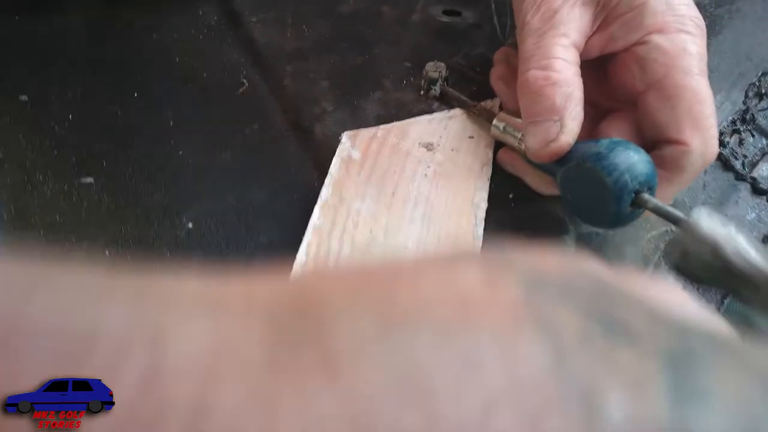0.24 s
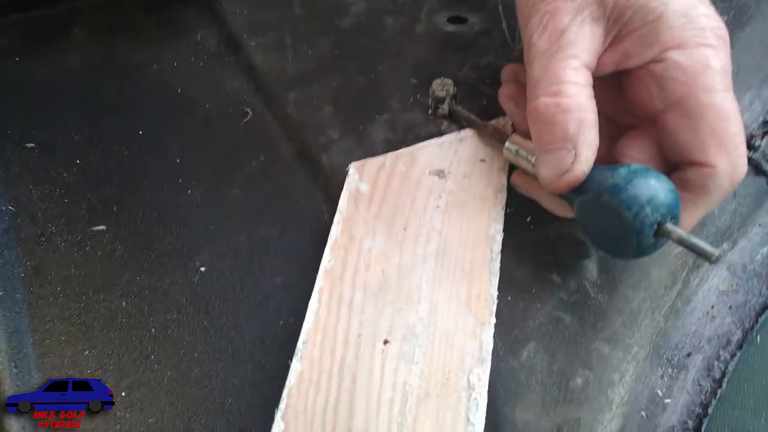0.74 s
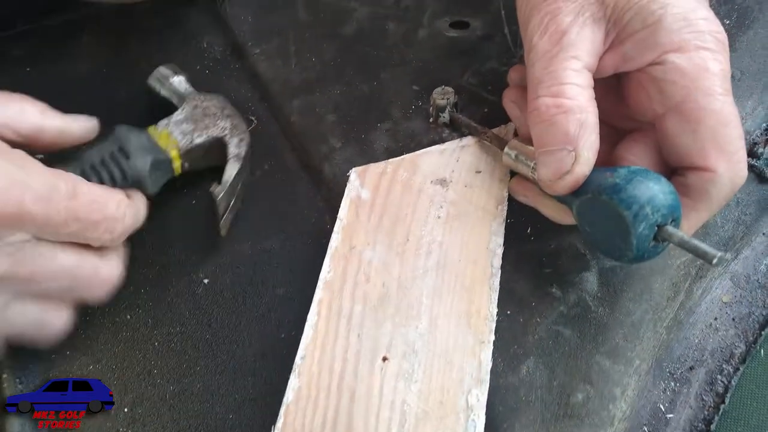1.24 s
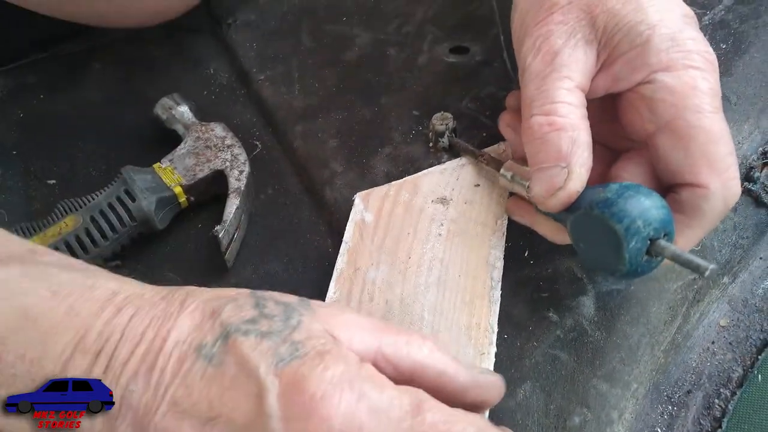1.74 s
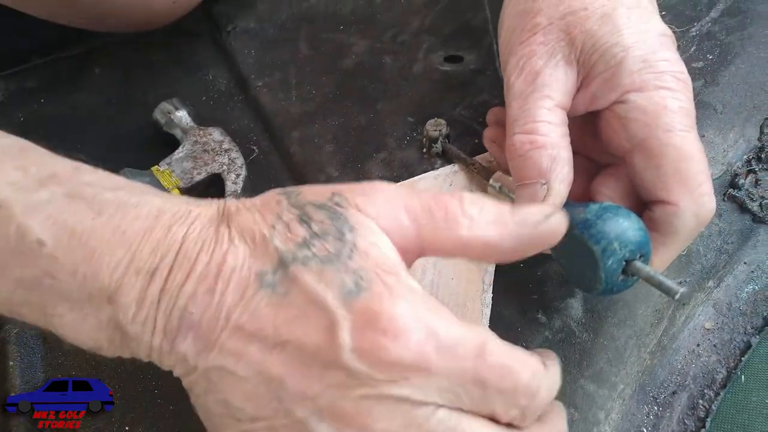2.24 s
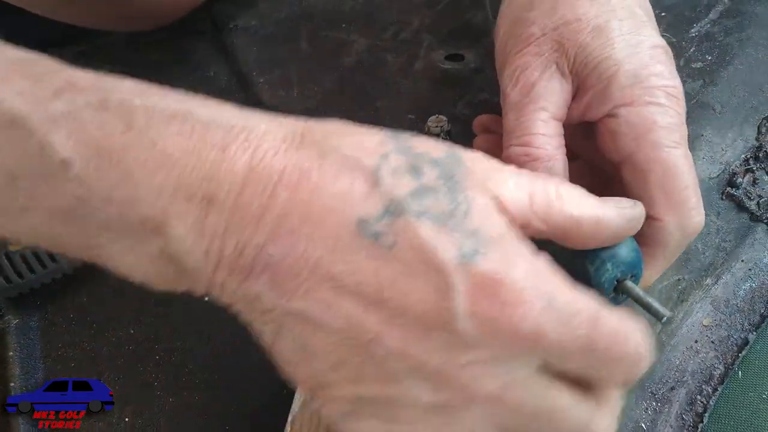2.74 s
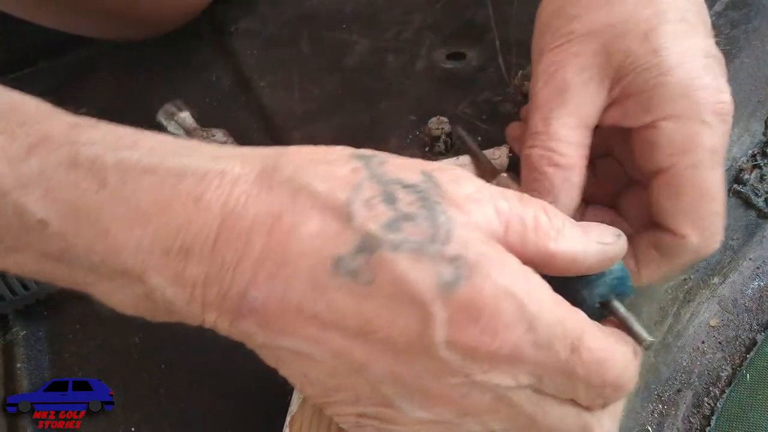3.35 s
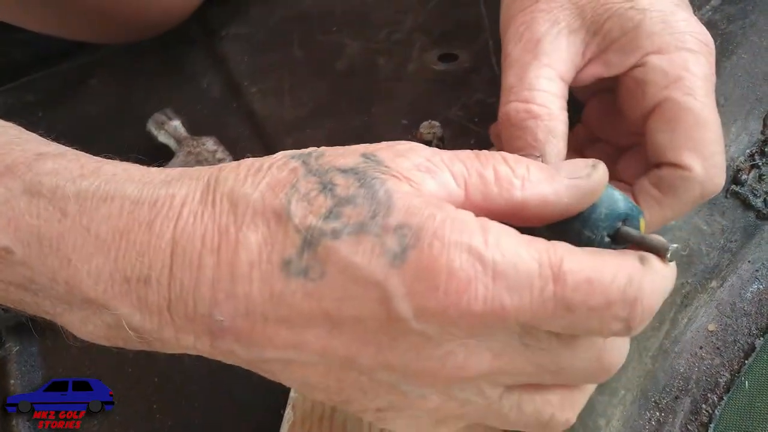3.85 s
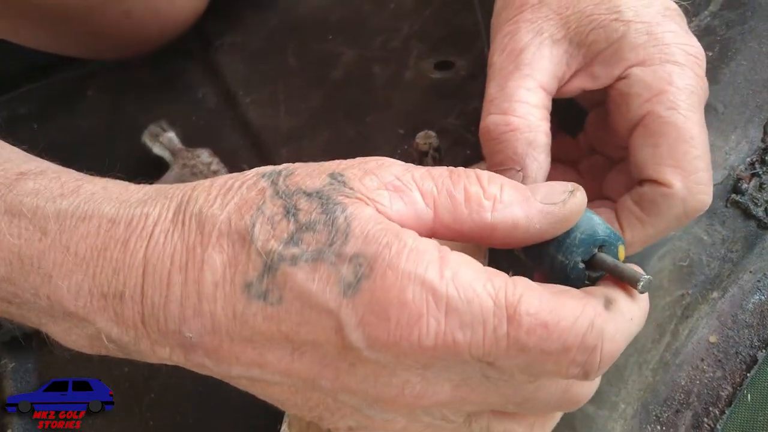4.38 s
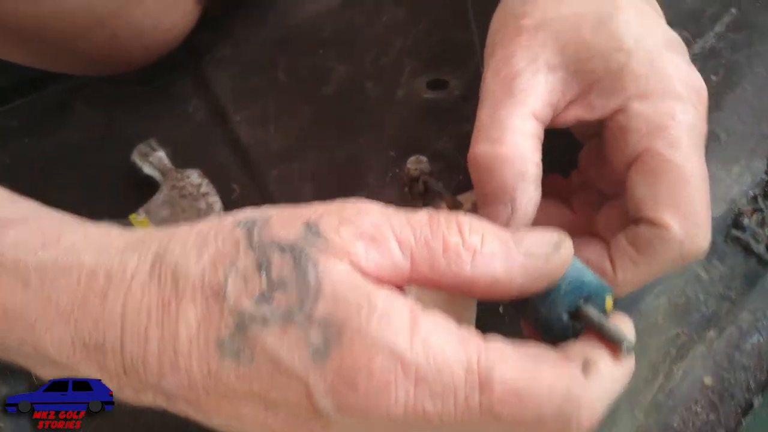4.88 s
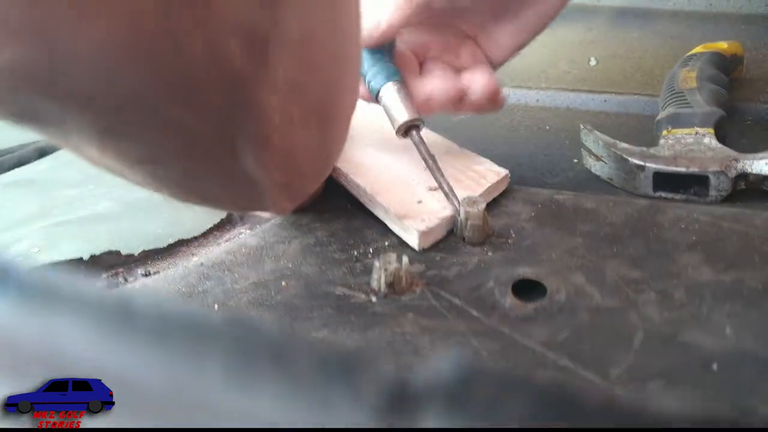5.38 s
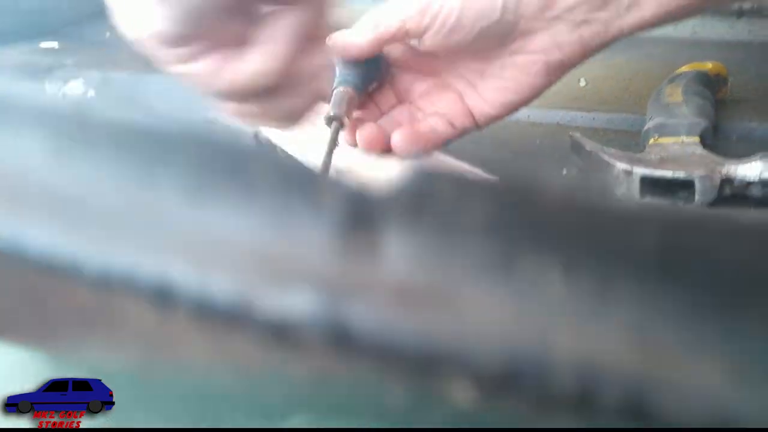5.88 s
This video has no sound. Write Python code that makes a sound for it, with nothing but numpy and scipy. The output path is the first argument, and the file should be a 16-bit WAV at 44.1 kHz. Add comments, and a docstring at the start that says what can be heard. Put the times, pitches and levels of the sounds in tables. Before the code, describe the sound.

Sharp clanging hammer blows on sheet metal, a heavy tool set down with a boom, then quiet handling, light taps and a late scraping flurry.

```python
"""Quiet workshop, two close microphone ports; the right one faces the work and hears more treble.
First a hammer taps a screwdriver wedged against a stud on a steel panel: ringing modes, cracks, dense noise.
Near 1.4 s the hammer head is laid flat on the panel, a contact with a long low boom, among tool and block knocks.
Then hands slide a wooden block and work the tool loose: uneven noise for rubbing, pitched pings for knocks.
Under it all lie shaped noise for still air, narrow noise for a distant machine, and hiss; thin tones glide past."""
import sys
import numpy as np
from scipy import signal
from scipy.io import wavfile
from scipy.ndimage import uniform_filter1d

SR = 44100
rng = np.random.default_rng(int(sys.argv[2]) if len(sys.argv) > 2 else 0)


def unload_audio(sound):
    """Save the sound as a 16-bit wav file, at the path given as the first command line argument."""
    columns = np.transpose(np.atleast_2d(sound))
    # keep every value between -1 and 1, then stretch to whole-number steps
    steps = np.round(np.clip(columns, -1, 1) * 32767)
    wavfile.write(sys.argv[1], SR, steps.astype(np.int16))


N = 269857


def from_db(db):
    """Decibels to amplitude."""
    return 10 ** (np.asarray(db) / 20)


def rms_one(x):
    """Scale to rms 1 over all channels together."""
    return x / np.sqrt(np.mean(x ** 2) + 1e-20)


def at_hz(points, hz):
    """Read a (pitch, value) curve on a log pitch axis."""
    pitch_hz, value = np.array(points).T
    return np.interp(np.log(hz), np.log(pitch_hz), value)


CONTACT_HZ = (130, 500, 2100, 8000)   # pitches of thud, body, clang, sizzle
RUB_HZ = (130, 550, 2300, 5200, 11000)   # pitches of thud, body, clang, crunch, sizzle


def blend(hz, *levels_db, places=CONTACT_HZ):
    """Levels placed at a few pitches and joined on a log axis."""
    weights = np.eye(len(places))
    return sum(level_db * np.interp(np.log(hz), np.log(places), weight)
               for level_db, weight in zip(levels_db, weights))


def drift(rate_hz):
    """Slow chance with spread 1: noise through two equal low-pass poles, drawn every 40 samples."""
    r = np.exp(-2 * np.pi * rate_hz * 40 / SR)
    slow = signal.lfilter([1], [1, -2 * r, r * r], rng.standard_normal(N // 40 + 2002))
    slow = rms_one(slow[2000:])   # drop the filter's start
    return np.interp(np.arange(N) / 40, np.arange(len(slow)), slow)


def resonate(x, hz, width_hz):
    """A two-pole resonance, like a body answering noise at one pitch."""
    r = np.exp(-np.pi * width_hz / SR)
    numerator = np.array([1, 0, -1]) * (1 - r * r) / 2
    return signal.lfilter(numerator, [1, -2 * r * np.cos(2 * np.pi * hz / SR), r * r], x)


def add(track, start_s, piece):
    """Lay a stereo piece into the track, trimmed at both ends."""
    at = round(start_s * SR)
    piece = piece[:, max(-at, 0):N - at]
    track[:, max(at, 0):max(at, 0) + piece.shape[1]] += piece


# dB between the ports for each unit of lean: pitch_hz, db_per_lean (negative lean favours the right)
SHADOW = [(100, -0.4), (300, 0), (1000, 0.6), (3000, 5.5), (8000, 3), (14000, 5)]


def sides(db, lean, hz):
    """Left and right gain; the port that faces away loses mostly treble."""
    half_db = 0.5 * lean * at_hz(SHADOW, hz)
    return from_db([db + half_db, db - half_db])


# how alike the two ports hear a sound: pitch_hz, likeness (1 = same, 0 = unrelated, -1 = opposite)
LIKENESS = [(60, 0.87), (130, 1), (290, 0.93), (640, 0.65), (1410, -0.04), (3100, -0.07), (6820, -0.43),
            (15000, 0.04)]
EDGES_HZ = 25 * 2 ** np.arange(0, 9.7, 0.4)


def bands(noise):
    """Stereo bands of rms 1, alike in the bass; neighbours use unrelated noise."""
    for k, (low, high) in enumerate(zip(EDGES_HZ, EDGES_HZ[1:])):
        band_pass = signal.butter(2, [low, high], "band", fs=SR, output="sos")
        mid, side = signal.sosfilt(band_pass, noise[k % 2])
        hz = np.sqrt(low * high)
        alike = at_hz(LIKENESS, hz)
        yield hz, rms_one(np.sqrt(1 + alike) * mid + np.sqrt(1 - alike) * side * [[1], [-1]])


def self_noise():
    """The microphone's own faint treble hiss: high-passed noise, unrelated in the two ports."""
    high_pass = signal.butter(2, 8000, "high", fs=SR, output="sos")
    return from_db(-76) * signal.sosfilt(high_pass, rng.standard_normal((2, N)))


# distant machine: pitch_hz, level_db (rms), width_hz
HUM = [(83.4, -66.5, 1.6), (142, -75, 9.1)]


def hum():
    """Distant machine: noise in narrow resonances gives low tones that waver, equal in both ports."""
    out = np.zeros(N)
    for hz, level_db, width_hz in HUM:
        out += from_db(level_db) * rms_one(resonate(rng.standard_normal(N), hz, width_hz))
    return out


# spectrum of the still workshop air: pitch_hz, level_db (per Hz, relative)
AIR = [(15, -53), (25, -18.5), (78, -12.5), (138, -4), (163, -15), (313, -14), (410, -29.5), (902, -20),
       (2330, -35.5), (2530, -24), (2750, -31), (4360, -37), (16500, -54.5)]
AIR_DB = -63.5   # rms of the whole


def still_air():
    """Still air of the workshop: bands of noise that each waver slowly in level."""
    air = np.zeros((2, N))
    for hz, band in bands(rng.standard_normal((2, 2, N))):
        level_db = at_hz(AIR, hz) + 1.1 * drift(2.5)
        air += from_db(level_db) * np.sqrt(hz) * band   # band width grows with pitch
    return from_db(AIR_DB) * rms_one(air)


# faint thin tones: start_s, length_s, start_hz, end_hz, level_db (rms before the fades), width_hz
TONES = [(1.8, 0.22, 3600, 2880, -61, 74), (3.7, 0.22, 1900, 2140, -58, 72),
         (3.955, .55, 3000, 2450, -83.5, 40), (4.535, 0.062, 4500, 4250, -70.5, 150),
         (2.756, 0.27, 2300, 2220, -63.5, 71), (4.678, 0.167, 2250, 2260, -59, 62),
         (5.03, 0.12, 2700, 2600, -68.5, 69), (5.027, .25, 3200, 2600, -59.5, 400),
         (5.292, 0.13, 2910, 2910, -70, 53), (5.32, 0.109, 2420, 2380, -69, 41)]


def thin_tones():
    """Thin gliding tones, roughened by narrow noise."""
    out = np.zeros((2, N))
    for start_s, length_s, start_hz, end_hz, level_db, width_hz in TONES:
        count = int(length_s * SR)
        phase = 2 * np.pi * np.cumsum(np.linspace(start_hz, end_hz, count)) / SR
        r = np.exp(-np.pi * width_hz / SR)
        a, b = signal.lfilter([1], [1, -2 * r, r * r], rng.standard_normal((2, 2, count)))
        tone = rms_one(a * np.cos(phase) + b * np.sin(phase))
        add(out, start_s, from_db(level_db) * np.hanning(count) ** 0.5 * tone)
    return out


# skin and wood sliding: start_s, rise_s, hold_s, fall_s,
# then thud_db, body_db, clang_db, crunch_db, sizzle_db, singing_db
RUB = [(1.187, 0.036, 0.027, 0.081, -33, -34, -26.5, -42.5, -48, -44.5),
       (1.352, 0.087, 0.059, 0.053, -36.5, -35, -53, -40.5, -42, -56.5),
       (1.451, 0.063, 0.025, 0.057, -37.5, -56, -54.5, -43.5, -45.5, -53),
       (1.701, 0.016, 0.053, 0.14, -50, -55.5, -45.5, -51.5, -50, -52.5),
       (1.831, .02, 0.11, 0.033, -61, -61.5, -58, -67, -65, -66.5),
       (2.064, 0.036, 0.085, 0.041, -59, -52.5, -46, -54, -53, -57),
       (2.173, .02, 0.076, 0.07, -48, -53.5, -45, -54, -57, -63),
       (2.299, 0.11, 0.097, 0.075, -56, -61, -51.5, -58.5, -59, -66.5),
       (2.753, 0.035, 0.092, 0.06, -53, -57, -50.5, -59.5, -61.5, -58.5),
       (2.967, 0.11, 0.011, .02, -49, -59.5, -53, -58.5, -63, -75),
       (3.319, .035, 0.048, 0.049, -61, -61, -44.5, -63.5, -62, -56),
       (3.445, 0.016, 0.049, 0.061, -53, -50, -54, -64, -65.5, -74),
       (3.568, 0.018, 0.09, 0.068, -55, -54, -54.5, -70, -66, -61),
       (3.688, 0.033, 0.025, 0.13, -54, -55, -55.5, -64, -67, -63.5),
       (3.862, .035, 0.014, 0.06, -54, -54.5, -62.5, -69, -79, -79),
       (4.644, 0.048, 0.013, .04, -60.5, -59, -53, -71, -69.5, -74),
       (5.115, 0.0095, 0.0057, 0.017, -36, -42, -68, -76, -49.5, -74),
       (5.151, 0.024, 0.019, 0.054, -49, -61, -56, -68, -59, -70),
       (5.417, 0.043, 0.044, 0.061, -53, -43.5, -50, -46.5, -52, -67),
       (5.461, 0.065, 0.019, .08, -47, -33.5, -33, -46.5, -51, -45),
       (5.61, 0.0068, 0.01, 0.023, -36, -31, -52, -59, -48.5, -49),
       (5.641, .02, 0.031, 0.11, -42, -26, -40.5, -48, -58, -45.5),
       (5.702, 0.0099, 0.061, 0.09, -53, -36, -50.5, -52.5, -57, -54),
       (5.997, 0.046, 0.023, 0.11, -75.5, -59, -56.5, -68.5, -71, -69)]
RUB_EDGE_DB = -16   # rise and fall times are counted to this level


def pressure():
    """Six levels in dB over time: every stroke rises, holds and falls away; the loudest one rules."""
    t = np.arange(N) / SR
    levels = np.full((6, N), -140.0)
    for start_s, rise_s, hold_s, fall_s, *levels_db in RUB:
        before = 1 - (t - start_s) / rise_s
        after = (t - start_s - rise_s - hold_s) / fall_s
        shape_db = RUB_EDGE_DB * np.maximum(np.maximum(before, after), 0)
        levels = np.maximum(levels, np.array(levels_db)[:, None] + shape_db)
    return uniform_filter1d(levels, size=200, axis=1)


# colour of the rubbing: pitch_hz, level_db (per band)
RUB_COLOUR = [(60, -19.5), (130, -9), (400, -5.5), (1000, -13), (2400, -15.5), (5200, -8), (8000, -14),
              (11000, 1), (16000, -2)]
# tool and block resonances under friction: pitch_hz, width_hz, level_db (relative)
RUB_PEAKS = [(396, 70, -5.5), (620, 89, -9.5), (1430, 70, -5.5), (1775, 77, -2.5), (2130, 81, -9.5),
             (2890, 120, -3.5), (4000, 170, -9.5), (4500, 550, -2.5)]
RUB_LEAN = -2.5


def rubbing():
    """Dense uneven micro-slips; all bands catch and let go together, and the tool's resonances sing along."""
    *colour, singing_db = pressure()
    clang_db = colour[2]
    slip_db = 2.4 * np.minimum(rng.exponential(1, N), 4)
    slips = rng.standard_normal((2, 2, N)) * from_db(slip_db)
    catch_db = 1.8 * drift(59) + 1.5 * drift(18)
    out = np.zeros((2, N))
    for hz, band in bands(slips):
        level_db = blend(hz, *colour, places=RUB_HZ) + at_hz(RUB_COLOUR, hz)
        level_db = level_db + catch_db + 2.1 * drift(3.9)
        out += band * from_db(level_db) * sides(0, RUB_LEAN, hz)[:, None]
    for hz, width_hz, peak_db in RUB_PEAKS:
        level_db = blend(hz, *colour, places=RUB_HZ) - clang_db + singing_db + peak_db
        level_db = level_db + catch_db + 3.8 * drift(4.6)
        singing = rms_one(resonate(slips[0], hz, width_hz))
        out += singing * from_db(level_db) * sides(0, RUB_LEAN, hz)[:, None]
    return out


def ringing(hz, t60_s, turn):
    """A dying sine that builds over a few cycles; the two ports meet it at different phases."""
    t = np.arange(int(1.5 * t60_s * SR) + 2) / SR
    fade = np.exp(-np.log(1000) * t / t60_s)
    cycles = hz * t
    swell = 1 - np.exp(-cycles / 3.5)
    lag = 0.5 * np.arccos(at_hz(LIKENESS, hz)) * turn
    return fade * swell * np.sin(2 * np.pi * cycles + np.array([[lag], [-lag]]))


def struck(contacts, modes, tone_db, scatter_db):
    """Each contact sets every mode ringing; a hand or block on the steel shortens the ring."""
    out = np.zeros((2, N))
    for start_s, strength_db, *colour, share, lean in contacts:
        for hz, mode_db, t60_s in modes:
            luck, turn = rng.standard_normal(2)
            level_db = strength_db + blend(hz, *colour) + tone_db + mode_db + scatter_db * luck
            add(out, start_s, sides(level_db, lean, hz)[:, None] * ringing(hz, t60_s * share, turn))
    return out


# dense ringing at full ring time: pitch_hz, t60_s
TAIL_T60 = [(80, 0.21), (210, 0.5), (560, 0.34), (1470, 0.31), (3880, 0.28), (10200, 0.2)]
# dense ringing: pitch_hz, level_db (per band, relative to the contact)
TAIL = [(60, -15), (150, -8.5), (300, -12), (700, -8.5), (1300, -15), (2600, -8), (5000, -12.5),
        (8000, -20), (11000, -13.5), (16000, -18.5)]
# first crack: pitch_hz, level_db (per band, relative to the contact)
CRACK = [(60, -34.5), (300, 0.5), (1000, -9), (2800, -6), (5000, -4.5), (8000, -14.5), (11000, 3),
         (16000, -9)]
CRACK_T60_S, SWELL_S = 0.018, 0.0039   # both lengthen in the bass
ROOM_DB, ROOM_T60_S = -20.5, 0.45   # room relative to the dense ringing


def contact(row, hz):
    """Stereo envelope of one contact in one band: crack, dense tail, faint room; lows start later."""
    _, strength_db, *colour, share, lean = row
    level_db = strength_db + blend(hz, *colour)
    t = np.arange(SR // 2) / SR
    steel = from_db(-60 * t / (at_hz(TAIL_T60, hz) * share))
    room = from_db(ROOM_DB - 60 * t / ROOM_T60_S)
    tail = (steel + room) * (1 - np.exp(-t / (SWELL_S + 0.5 / hz)))
    crack = from_db(-60 * t / (CRACK_T60_S + 0.5 / hz)) * (1 - np.exp(-t / (0.0001 + 0.5 / hz)))
    tail_gain = sides(level_db + at_hz(TAIL, hz), 0.067 * lean, hz)   # the tail arrives from all round
    crack_gain = sides(level_db + at_hz(CRACK, hz), lean, hz)
    return tail_gain[:, None] * tail + crack_gain[:, None] * crack


def clatter(contacts, same_spot):
    """Dense noise-like ringing; contacts on the same spot repeat one noise pattern."""
    out = np.zeros((2, N))
    rattle_db = 1.1 * drift(55)   # loose parts buzz while the steel rings
    for hz, band in bands(rng.standard_normal((2, 2, N))):
        rough = band * from_db(rattle_db + 1.5 * drift(25))
        envelope = np.zeros((2, N))
        for row in contacts:
            shape = contact(row, hz)
            if same_spot:
                add(out, row[0], shape * rough[:, SR:SR + shape.shape[1]])
            else:
                add(envelope, row[0], shape)
        out += envelope * rough
    return out


def pings(knocks, t60_s):
    """A loose piece rings at its own pitch, for a time given with each knock."""
    out = np.zeros((2, N))
    for (start_s, strength_db, *_, lean, hz, ping_db), ring_s in zip(knocks, t60_s):
        gain = sides(strength_db + ping_db, lean, hz)
        add(out, start_s, gain[:, None] * ringing(hz, ring_s, rng.standard_normal()))
    return out


# the panel's modes, ringing freely: pitch_hz, level_db (relative), t60_s
PANEL = [(107.4, -17, 0.84), (155.8, -12, 0.45), (183.8, -4, .63), (275.8, -3.5, 0.38), (301.5, 5.5, 0.23),
         (310.6, -1.5, 0.36), (326, 1.5, 0.44), (419, -12, 0.46), (540, -15, 0.15), (570, -7.5, 0.066),
         (637, -19, 0.15), (775, -14, 0.37), (843.5, -11, 0.46), (914, -11, 0.13), (937.5, -11.5, 0.47),
         (1247, -23, 0.24), (1410, -20.5, 0.35), (1470, -21.5, 0.21), (1650, -17.5, 0.04),
         (1767, -20, 0.029), (1630, -21.5, 0.057), (2078, -23.5, 0.06), (2505, -17, 0.1),
         (2920, -20, 0.054), (2700, -18, 0.16), (2890, -19, 0.2), (3660, -21, 0.043), (3950, -23.5, 0.052),
         (4130, -19.5, 0.13)]
# tools and block touching the panel: start_s, strength_db, then relative to it thud_db, body_db, clang_db,
# sizzle_db, then share (of the free ring time), lean (negative to the right), ping_hz, ping_db (relative)
KNOCKS = [(1.099,-8,-32.5,-8,-6,-23,0.69,-3.5,1798,-3.5), (1.121,-12.5,-10,-18,-19,-23,0.7,-6,733,-0.5),
          (1.177,-8.5,-15.5,-13.5,-14.5,-39,0.82,-4.5,607,-10), (1.206,-23,-26,-3,-14,-54,1,-7,263,5),
          (1.216,-12.5,-9,-20,-19,-28.5,.42,-4.5,192,9), (1.399,-13.5,-47,0,-4,-35,1,-8.5,911,-6),
          (1.657,-41.5,15,-36,-1.5,-27,0.19,-1,346,-9), (1.701,-38,-13,-35,-14,-12,.36,-4.5,242,-12),
          (1.718,-35.5,-22,-29,-10,-9,0.68,-2,2820,-2.5), (1.746,-27.5,-31,-23,-15,-10,0.36,-3.5,2770,-17),
          (1.764,-32,-20,-17,-14,-14,0.78,-4,357,-3), (1.832,-38.5,1.5,-11,-5,-45,0.5,-5,305,-8),
          (1.874,-47,-25,-28,-34,-9,0.42,-5,250,-15), (1.93,-40.5,-7,-22,-34,-10,.45,-2.5,247,-10),
          (2.004,-37,-36,-44,-39,-7.5,0.62,-3.5,251,-18), (2.023,-45,-14,-15,-10.5,-24,0.44,-4.5,904,1.5),
          (2.179,-34.5,-30,-13.5,-4,-21.5,0.34,-1.5,372,-24), (2.763,-44.5,-17.5,-8,-13,-19.5,1,-7,368,-17),
          (2.913,-38.5,-29,-18,-19,-16,0.51,-5,327,0), (3.079,-22,-17.5,-13,-7.5,-16.5,0.61,-2.5,426,-2.5),
          (3.092,-22.5,-22,-13.5,-14,-41.5,0.82,-12,336,-22),
          (3.289,-38,-7.5,-7.5,-17,-20,0.42,-3.5,320,-9), (3.389,-26.5,-21,-4.5,-30,-36,0.3,-6,320,4),
          (3.439,-21,-37,-10.5,-10,-40,0.61,-4,345,0.5), (3.643,-31.5,-12.5,-10,-22,-42,0.44,-7,326,-1),
          (3.73,-38,-27,-19,-14,-28.5,0.6,-7,436,2), (3.905,-39,-5,-14.5,-21.5,-25,0.52,-6,304,-1),
          (4.307,-49,-7,-12.5,-14,-32,0.54,-6,316,-9), (4.426,-56,-10,-10.5,-10.5,-28,0.63,-9,325,-11.5),
          (4.653,-43.5,-13.5,-14.5,-8,-30,0.62,-2,318,-1.5),
          (4.694,-40.5,-14.5,-17,-21,-25,0.74,-4.5,300,-6),
          (4.768,-27.5,-13.5,-9.5,-40,-45.5,.45,-7.5,312,-1),
          (4.894,-44.5,-7.5,-9.5,-23,-25,0.67,-4.5,305,2.5),
          (5.125,-29.5,-16,-5.5,-21,-28.5,0.52,-0.5,283,-12), (5.189,-41,-38.5,-10,-23,-17,1,-4.5,576,-2),
          (5.431,-38,-11.5,-7,-22,-15,0.97,4,365,-15), (5.584,-24.5,-11,-20.5,-16.5,-18,0.51,-0.5,547,-3),
          (5.615,-15.5,-35,-14,-10.5,-40,0.9,-8,537,-3), (5.665,-21,-21,-13.5,-28,-42,0.75,-13,425,-19),
          (5.679,-18,-13.5,-19,-2.5,-51,0.57,-8,563,7.5), (5.715,-18,-41,-56,-4,-11.5,0.26,-4,2940,-9),
          (5.726,-18.5,-32,-48,-10,-44,0.77,-7,583,-2.5), (5.77,-22,-34,-53,-16.5,-51,1,-10,593,-7),
          (5.861,-36,-22,-21,-22,-14.5,0.87,-2,617,-4.5), (6.015,-45.5,-20.5,-12,-12.5,-21,0.46,-5,312,-5),
          (6.031,-39,-36,-29.5,-17,-16,0.28,-5.5,2870,-23)]
# the hammer head laid flat on the panel: same columns
HEAD_DROP = [(1.387, -1.8, -21.5, -14, -8.5, -28.5, .75, -3.5, 186, -16.5)]
KNOCK_PANEL_DB, DROP_PANEL_DB = -3.5, -0.5   # how strongly the panel's tones answer
PING_T60_S, BOOM_T60_S = 0.11, 0.77   # ping at full share; boom of the hammer head


def knocks_and_head_drop():
    """Tool, block and hammer head touch the panel and ring; a firmer grip shortens the tool's ping."""
    knocks = [row[:-2] for row in KNOCKS]
    drop = [row[:-2] for row in HEAD_DROP]
    steel = struck(knocks, PANEL, KNOCK_PANEL_DB, scatter_db=2.5)
    steel += struck(drop, PANEL, DROP_PANEL_DB, scatter_db=2.5)
    ping = pings(KNOCKS, [PING_T60_S * row[6] for row in KNOCKS])
    boom = pings(HEAD_DROP, [BOOM_T60_S])
    return steel + ping + boom + clatter(knocks + drop, same_spot=False)


# the screwdriver's modes: pitch_hz, level_db (relative), t60_s (at full share)
SHAFT = [(2372, -3.5, 0.035), (2870, 3, 0.012), (3580, -2.5, 0.0069), (4270, -1, 0.02)]
# hammer blows: start_s (the first begins before time zero), strength_db,
# then relative to it thud_db, body_db, clang_db, sizzle_db, then share (of the free ring time)
BLOWS = [(-0.15, -5, -21, -15.5, -22, -20, 0.99), (0.03, 1, -20.5, -14, -16.5, -17.5, 1),
         (0.215, 0, -23.5, -17.5, -17.5, -21, 0.72), (0.255, -5.5, -22.5, -13, -9.5, -19.5, .8),
         (0.442, 1, -21, -15, -16.5, -19, 0.94), (0.63, 0, -18, -11.5, -16, -15.5, 0.95)]
BLOW_LEAN = -4.5   # toward the right port


def hammer_blows():
    """The hammer drives panel and screwdriver modes, always on the same spot, so its pattern repeats."""
    blows = [(*row, BLOW_LEAN) for row in BLOWS]
    steel = struck(blows, PANEL, tone_db=1, scatter_db=0.23)
    screwdriver = struck(blows, SHAFT, tone_db=3.5, scatter_db=3.5)
    return steel + screwdriver + clatter(blows, same_spot=True)


def scene():
    """The workshop from its background forward to the hammer."""
    background = self_noise() + hum() + still_air() + thin_tones()
    return background + rubbing() + knocks_and_head_drop() + hammer_blows()


LIMIT_DB, SQUEEZE = -3, 0.19   # threshold; share of the excess taken off
RELEASE_DB_S, ATTACK_S = 64, 0.006   # fall of the held excess; smoothing of the gain


def record(dry):
    """Bass cut, gain control that ducks after loud blows and recovers steadily, rounded peaks, top cut."""
    x = signal.sosfilt(signal.butter(3, 70, "high", fs=SR, output="sos"), dry)
    ramp_db = RELEASE_DB_S * np.arange(N) / SR
    over_db = np.maximum(20 * np.log10(np.abs(x).max(axis=0) + 1e-9) - LIMIT_DB, 0)
    held_db = np.maximum(np.maximum.accumulate(over_db + ramp_db) - ramp_db, 0)
    r = np.exp(-1 / (ATTACK_S * SR))
    smooth_db = signal.lfilter([1 - r], [1, -r], held_db)
    x = x * from_db(-SQUEEZE * smooth_db)
    rounded = 1.033 * np.tanh(x / 1.051)
    return signal.sosfilt(signal.cheby2(16, 100, 16900, fs=SR, output="sos"), rounded)


dry = scene()
out = record(dry)
unload_audio(out)
```